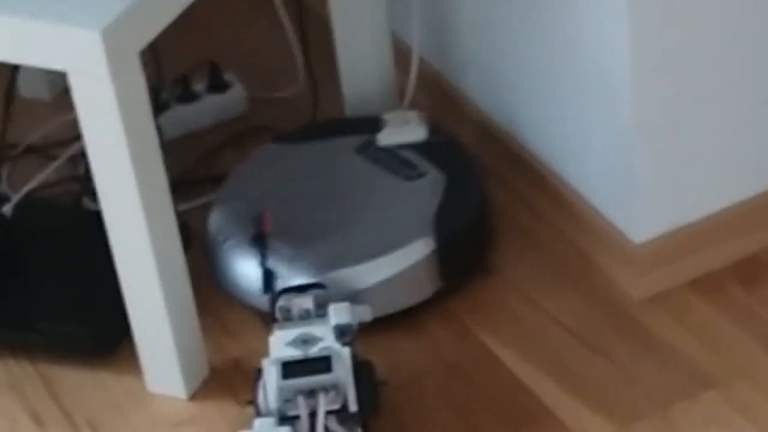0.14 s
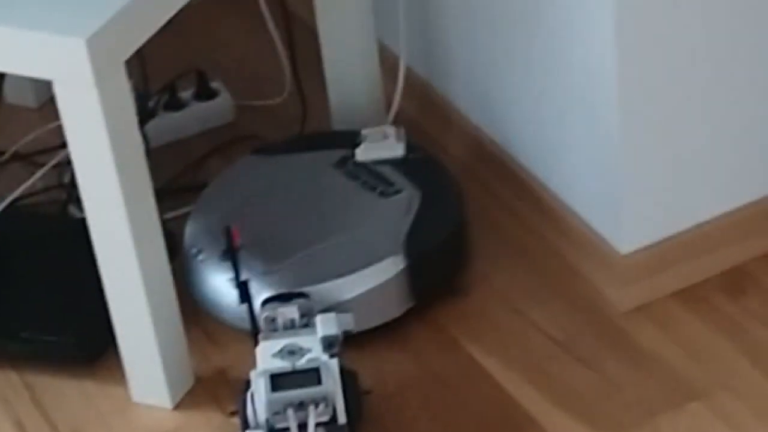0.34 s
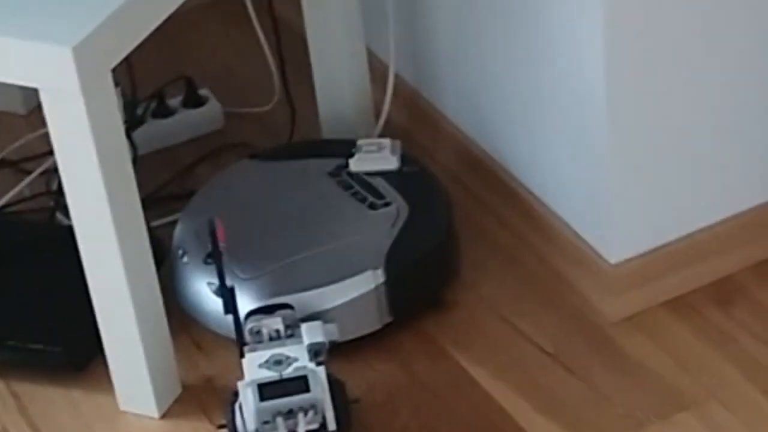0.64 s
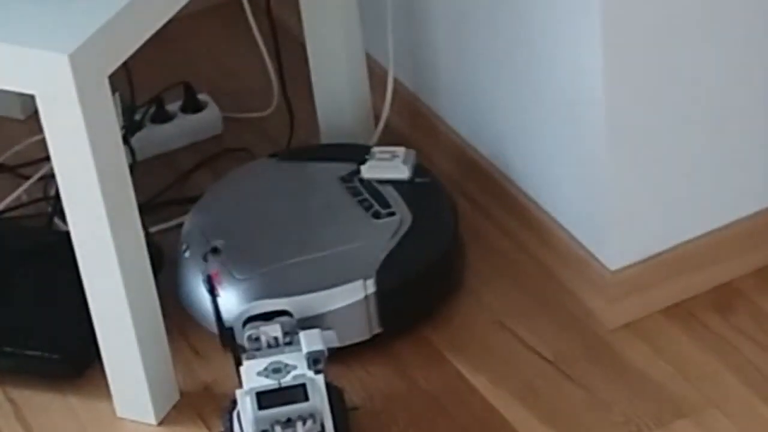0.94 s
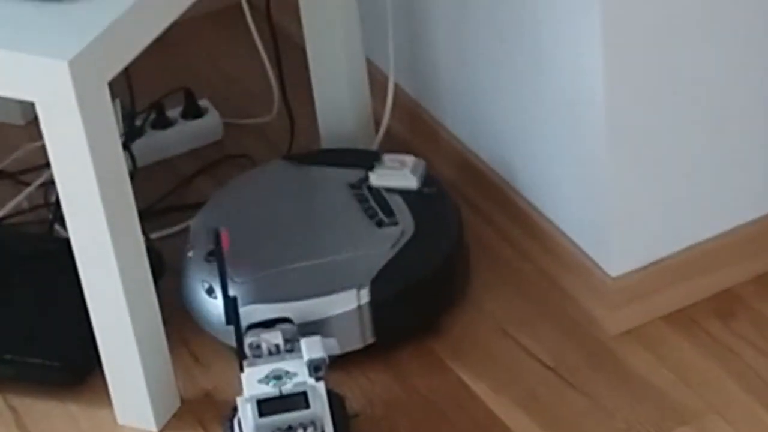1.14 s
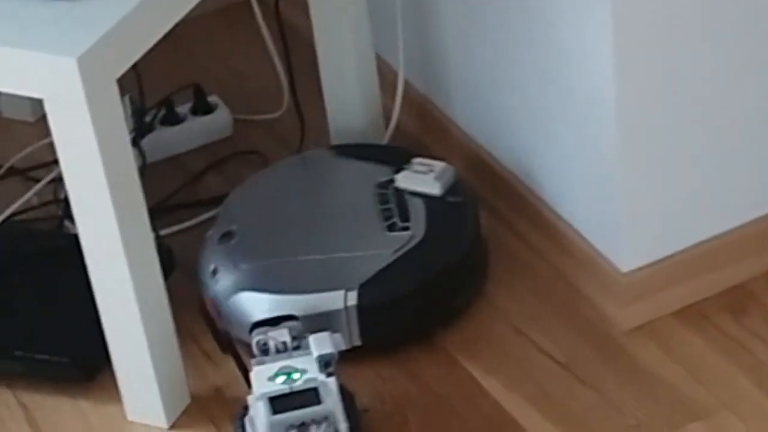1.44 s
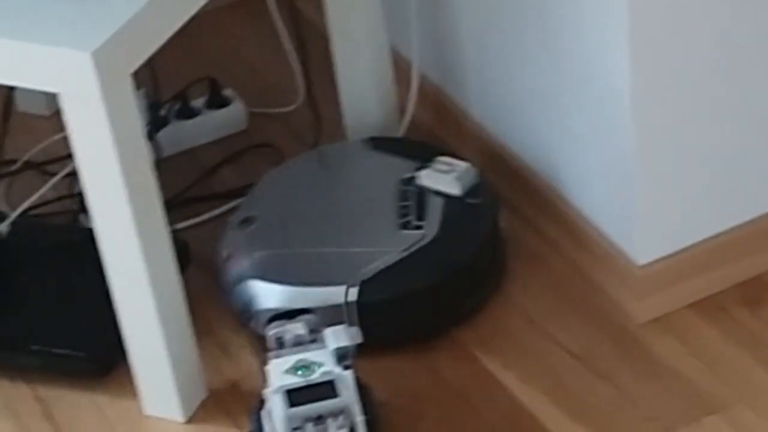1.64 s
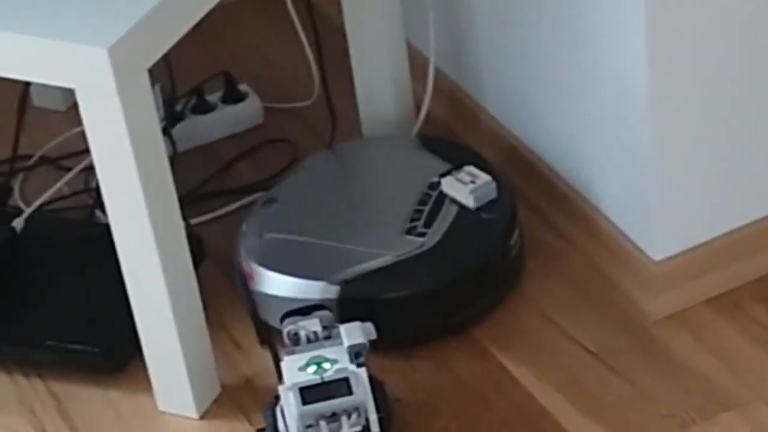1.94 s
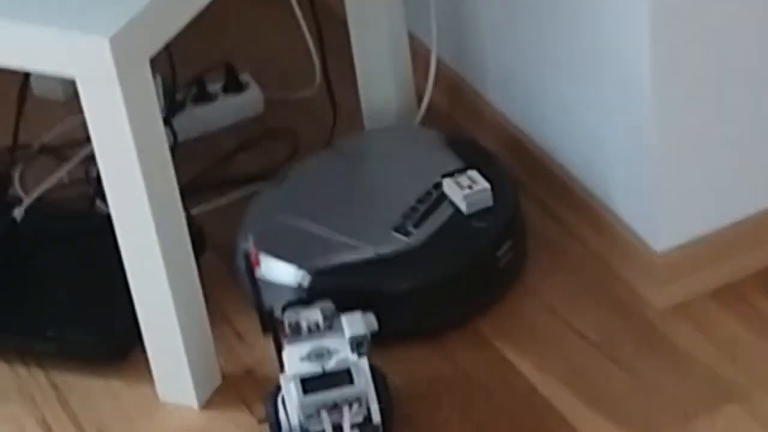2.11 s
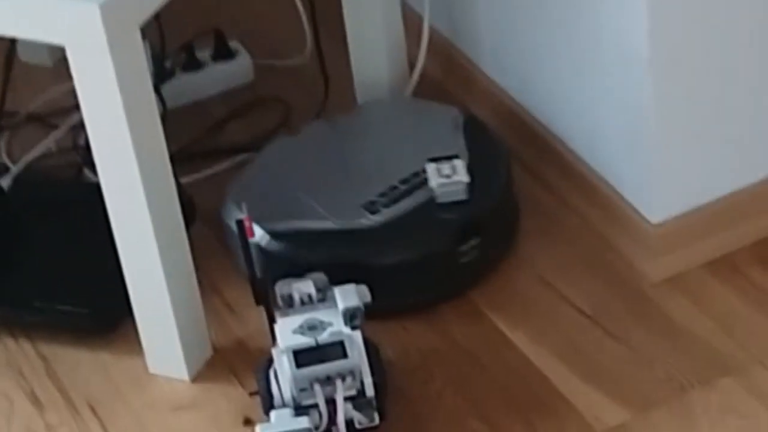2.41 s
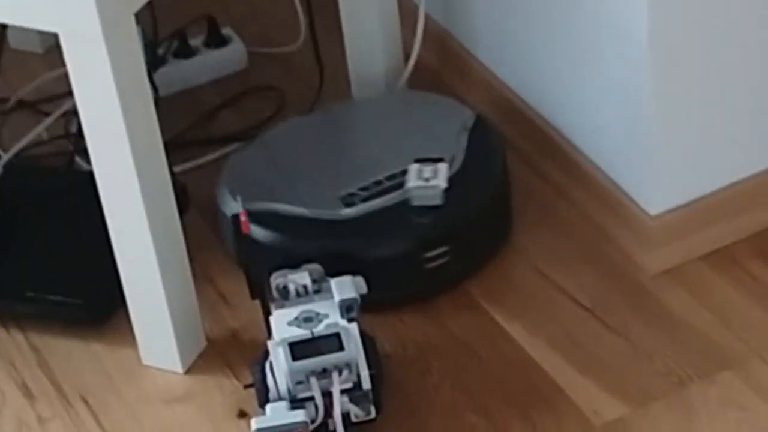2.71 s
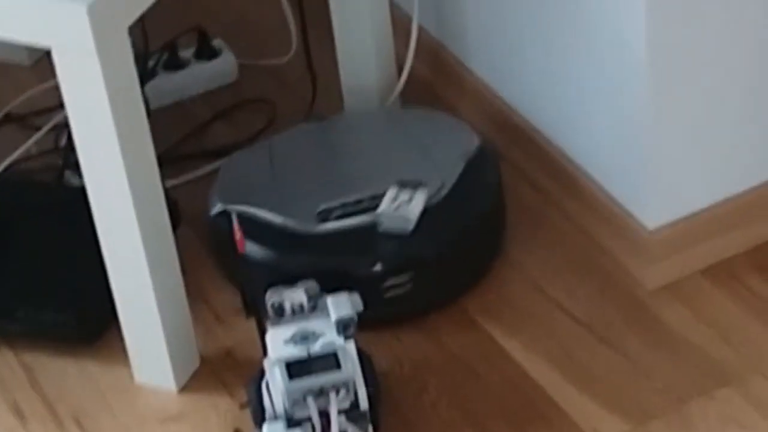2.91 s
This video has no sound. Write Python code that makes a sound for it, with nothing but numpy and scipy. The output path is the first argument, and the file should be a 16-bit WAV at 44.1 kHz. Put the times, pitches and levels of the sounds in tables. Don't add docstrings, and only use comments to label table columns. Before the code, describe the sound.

A robot vacuum whirs steadily on a wooden floor while a toy robot's servos grind and knock it.

```python
import sys
import numpy as np
from scipy import signal
from scipy.fft import rfft, irfft
from scipy.io import wavfile
from scipy.ndimage import uniform_filter1d

SR = 44100
rng = np.random.default_rng(int(sys.argv[2]) if len(sys.argv) > 2 else 0)


def wav_out(sig):
    wavfile.write(sys.argv[1], SR, np.round(np.clip(np.atleast_2d(sig).T, -1, 1) * 32767).astype(np.int16))


def makeup_ratio(level_db):
    decades = np.asarray(level_db, float) / 20
    return 10 ** decades


N = 134946
TURN_HZ = 48.15
FLUTTER_HZ, FLUTTER_TURN = 28.93, -.13


def shaft_hum():
    # (time [s], rotation [Hz], level [dB])
    shaft = [(0, 47.87, -47), (.7, 48, -41), (1.0, 48.2, -46.5), (1.2, 48.05, -41), (1.5, 48.27, -45),
             (1.7, 48.24, -40), (1.9, 48.12, -42), (2.0, 48, -40), (2.4, 48.12, -38), (2.7, 48.14, -38),
             (3.06, 48.24, -39)]
    # (shaft multiple [1], level [dB])
    gears = [(3, -21), (4, -19), (5, -15), (8, -4), (9, -13), (12, -9), (13, -12), (15, -13), (16, -9),
             (18, -13), (19, -12), (20, 1.5), (22, -8), (23, -9), (24, -8), (25, -11), (26, -10), (27, -11),
             (28, -7), (30, -14), (32, -14), (33, -6), (35, -11), (36, -9)]
    waver_db, wobble = 1.6, .001
    count = len(gears)
    drift = slow(.18, size=2 * count + 1)
    turns = np.cumsum(curve(shaft, column=1) * (1 + wobble * drift[-1])) / SR
    hum = 0
    for (order, db), waver, slip in zip(gears, drift[:count], drift[count:]):
        phase = 2 * np.pi * (order * turns + .15 * slip + rng.random())
        hum = hum + makeup_ratio(db + waver_db * waver) * np.sin(phase)
    return makeup_ratio(curve(shaft, column=2) + 1.5) * hum


def air_rush():
    # (frequency [Hz], spectral density [dB per Hz])
    air_spectrum = [(30, -51), (120, -51.5), (255, -11.5), (330, -1.5), (1000, 0), (1750, -1), (2100, -18),
                    (6000, -65.5)]
    # (frequency [Hz], spectral density [dB per Hz])
    jet_spectrum = [(1000, -34), (2200, -4.5), (3600, 1.5), (4600, -9.5), (8300, -17.5), (9200, -46),
                    (12000, -37), (15700, -48)]
    air = colour(geared(rng.standard_normal(N)), air_spectrum)
    jet = colour(geared(rng.standard_normal(N)), jet_spectrum)
    air = patchy(air, patchy_db=1.0, streak_db=2.0)
    jet = patchy(jet, patchy_db=0.9, streak_db=1.7) * ripple(hz=173.4, depth=0.11)
    return makeup_ratio(-35.5) * air + makeup_ratio(-38.5) * jet


def geared(x, repeat=.15):
    again = repeat * np.exp(-2j * np.pi * np.fft.rfftfreq(N, 1 / SR) / TURN_HZ)
    return irfft(rfft(x) * np.sqrt(1 - repeat ** 2) / (1 - again), N)


def ripple(hz, depth):
    speed = hz * (1 + 0.014 * slow(0.16, size=1)[0])
    return 1 + depth * np.cos(2 * np.pi * np.cumsum(speed) / SR)


def shell_modes():
    # (frequency [Hz], bandwidth [Hz], level [dB])
    modes = [(147.6, 11, -22), (205, 9, -6.5), (261.9, 10, 6.5), (382, 9, -15), (607, 82, -2.5),
             (990, 32, 1), (1560, 98, -5)]
    return makeup_ratio(-42.5) * evened(ring(rng.standard_normal(N), modes, widen=0.74))


def wheel_motor():
    # (time [s], frequency [Hz], level [dB])
    motor = [
        (2.15, 3430, -62),
        (2.3, 3400, -58),
        (2.5, 3436, -69),
        (2.75, 3483, -56),
        (2.9, 3530, -64),
        (3.06, 3555, -61),
    ]
    speed = curve(motor, column=1) + 15 * rng.standard_normal(N)
    db = curve([(1.9, 0, -88)] + motor, column=2)
    return makeup_ratio(db + 16.0 + 2.3 * slow(.18, size=1)[0]) * np.sin(2 * np.pi * np.cumsum(speed) / SR)


def servos():
    # (time [s], level [dB])
    effort = [(0, -37.5), (.1, -38), (.2, -37.5), (.5, -40), (.6, -37.5), (.7, -34.5), (.83, -37),
              (1.0, -39.5), (1.14, -40), (1.26, -39.5), (1.5, -36.5), (1.66, -40.5), (1.8, -36.5),
              (2.0, -40.5), (2.15, -46), (2.4, -48), (3.06, -48.5)]
    # (frequency [Hz], spectral density [dB per Hz])
    grind_spectrum = [(250, -38.5), (700, -2), (1400, 2.5), (3400, -0.5), (4800, -4), (8200, -7),
                      (10000, -17), (12500, -25.5), (15700, -36.5)]
    # (frequency [Hz], bandwidth [Hz], level [dB])
    poses = [
        [(2610, 47, 17), (3500, 210, -16), (3800, 30, 3), (8160, 32, 10)],
        [(4500, 49, -12), (6000, 150, -17), (7050, 34, 9), (7540, 32, 13.5), (8800, 15, -46), (9940, 47, 5)],
        [(5960, 46, 8), (6590, 67, 2.5), (6600, 33, -17), (8160, 25, -1), (9500, 50, 2)],
    ]
    pose_times = [.1, .55, 1.2, 1.5]
    pose_levels = [-9, -8.5, -6]
    grit_share = 0.37
    drive = grit_share * evened(grit(per_s=2500, spread_db=2.5, size=N))
    drive = drive + (1 - grit_share) * rng.standard_normal(N)
    drive = drive * ripple(hz=248, depth=0.15)
    pose = np.interp(np.arange(N) / SR, pose_times, [0.64, 0.65, 1.2, 1.47])
    housing = 0
    for k, (modes, db) in enumerate(zip(poses, pose_levels)):
        nearness = np.sqrt(np.clip(1 - abs(pose - k), 0, 1))
        housing = housing + nearness * makeup_ratio(db) * evened(ring(drive, modes, widen=1.6))
    grind = patchy(colour(drive, grind_spectrum), patchy_db=2.0, streak_db=2.2)
    return makeup_ratio(curve(effort, column=1)) * (makeup_ratio(4.5) * grind + housing)


def songs():
    # (start [s], length [s], frequency [Hz], level [dB])
    tones = [(0.025, 0.15, 1260, -40.5), (0.31, 0.2, 1281, -40), (0.26, 0.38, 2100, -43.5),
             (0.63, 0.11, 3160, -43), (0.6, 0.35, 2520, -45), (0.554, 0.13, 1300, -42.5),
             (0.652, 0.24, 6100, -50.5), (.88, 0.46, 11000, -73), (1.5, 0.45, 2800, -50),
             (1.82, 0.27, 2500, -46), (1.9, 0.18, 2700, -41), (1.255, .2, 1810, -46),
             (2.716, .34, 1300, -45), (2.85, .2, 1400, -47.5), (2.1, 0.24, 7000, -58),
             (2.408, 0.31, 1740, -47)]
    rough_hz = 11.9
    t, out = np.arange(N) / SR, 0
    for (start, length, hz, db), drift in zip(tones, slow(.03, size=len(tones))):
        swell = np.sqrt(np.sin(np.pi * np.clip((t - start) / length, 0, 1)) + 1e-9)
        phase = 2 * np.pi * np.cumsum(hz + rough_hz * drift[::-1]) / SR
        out = out + makeup_ratio(db + 7.5 + 0.91 * drift) * swell * np.sin(phase)
    return out


def knocks():
    # (time [s], peak level [dB], rattle length [s], part struck [index])
    impacts = [(0.198, -20, 0.0051, 0), (0.2059, -19.5, 0.011, 0), (0.222, -8, 0.0024, 0),
               (0.229, -16.5, 0.018, 0), (0.238, -23.5, 0.0055, 0), (0.339, -26, 0.008, 0),
               (.82, -27.5, 0.0064, 1), (1.3034, -19, 0.023, 1), (1.309, -18.5, 0.0058, 1),
               (1.36, -29, 0.0083, 1), (1.545, -22, 0.011, 2), (1.559, -21, 0.0073, 2),
               (1.578, -16, 0.0097, 2), (1.586, -18, .004, 2), (1.7045, -26, 0.0026, 2)]
    # (frequency [Hz], bandwidth [Hz], level [dB])
    part_modes = [
        [(614, 83, 0.5), (1280, 220, -0.5), (1825, 170, 0), (1935, 130, 0.5), (2680, 130, -0.5),
         (3220, 210, -15), (4800, 92, -26), (6200, 37, -16), (7670, 1500, -13)],
        [(614, 84, -5), (1610, 85, 3), (1832, 91, 0.5), (2810, 60, -3), (2982, 38, 0.5), (3220, 35, -0.5),
         (3676, 130, -1), (7500, 500, -10)],
        [(640, 59, -8), (1340, 150, -16), (2330, 54, -6), (2627, 110, 0), (3006, 100, 3), (3376, 80, -14)],
    ]
    # (frequency [Hz], spectral density [dB per Hz])
    crack_spectra = [
        [(400, -27.5), (600, -0.5), (1300, -2), (3200, 1.5), (5200, -13), (8000, -4), (9500, -24.5),
         (15700, -34)],
        [(200, -42), (620, -1.5), (1100, -22.5), (1700, -8.5), (3400, -0.5), (4500, -14.5), (7800, -8.5),
         (15700, -50)],
        [(200, -36), (700, -13), (2000, -6.5), (2700, -1), (3700, -12), (4600, -18.5), (9000, -27),
         (15700, -51)],
    ]
    ring_levels = [-2.5, -5, -4.5]
    wet_levels = [2.5, 4.5, 1.3]
    rise_s = .004
    t, out = np.arange(N) / SR, np.zeros(N)
    ticks = evened(grit(per_s=5000, spread_db=1.0, size=N)) + 0.68 * rng.standard_normal(N)
    for part in range(len(part_modes)):
        envelope = np.zeros(N)
        for start, db, length, struck in impacts:
            if round(struck) == part:
                rise = np.clip((t - start) / rise_s, 0, 1)
                envelope += makeup_ratio(db) * rise * np.exp(-(np.maximum(t - start, 0) / length) ** 4)
        force = envelope * ticks
        crack = colour(force, crack_spectra[part])
        rung = ring(force, part_modes[part], widen=0.31)
        crack = crack / np.linalg.norm(crack)
        rung = makeup_ratio(ring_levels[part]) * rung / np.linalg.norm(rung)
        direct = 0.5 * np.linalg.norm(force) * (crack + rung)
        out += direct + makeup_ratio(wet_levels[part]) * signal.fftconvolve(direct, room())[:N]
    return out


def clicks():
    # (time [s], peak level [dB], frequency [Hz])
    snaps = [
        (0.21, -31, 10700),
        (0.2329, -28, 10800),
        (0.2464, -32, 11400),
        (0.3424, -31, 12200),
        (0.611, -40, 12500),
        (0.81, -36, 11900),
        (1.3054, -29, 10900),
    ]
    decay_s, width_hz = .002, 2400
    t, noise = np.arange(N) / SR, rng.standard_normal(N)
    direct = 0
    for start, db, hz in snaps:
        burst = noise * (t > start) * np.exp(-np.maximum(t - start, 0) / decay_s)
        direct = direct + ring(burst, [(hz, width_hz, db + 5.5)])
    return direct + makeup_ratio(3.5) * signal.fftconvolve(direct, room())[:N]


def room():
    # (frequency [Hz], time to fall 60 dB [s])
    decay = [(400, 1.5), (1500, 1.55), (3500, 1.9), (8000, 1.6), (14000, 0.66)]
    hz, t, z = signal.stft(rng.standard_normal(2 * SR), SR, nperseg=256)
    tail = signal.istft(z * makeup_ratio(-60 * t / read(decay, hz)[:, None]), SR, nperseg=256)[1]
    onset = np.minimum(np.arange(len(tail)) / SR / 0.0061, 1)
    return tail * onset / np.linalg.norm(tail)


def microphone_hiss():
    # (frequency [Hz], spectral density [dB per Hz])
    hiss_spectrum = [(5000, -16), (9000, -5), (12300, 0), (15700, -3)]
    return makeup_ratio(-65) * evened(colour(rng.standard_normal(N), hiss_spectrum))


def slowed(x):
    # (time [s], jump back [s])
    known_jumps = [
        (.246, .018),
        (.35, .0185),
        (1.318, .0164),
        (1.595, .0215),
    ]
    shortest_s, longest_s, on_turn_share = .0155, .027, .3
    fade_in, hold_to, fade_out = .36, .5, .12
    out, step = x.copy(), SR / FLUTTER_HZ
    turn = np.arange(round((fade_in / 2 + hold_to + fade_out) * step)) / step
    fade = np.minimum(turn / fade_in, (turn[-1] - turn) / fade_out)
    again = np.clip(fade, 0, 1) * np.pi / 2
    count = int(N / step)
    luck = rng.random((count + 1, 2))
    free_jump = shortest_s + (longest_s - shortest_s) * luck[:, 1]
    jump = np.where(luck[:, 0] < on_turn_share, 1 / TURN_HZ, free_jump)
    for s, back in known_jumps:
        jump[round(s * FLUTTER_HZ + FLUTTER_TURN)] = back
    for k in range(1, count + 1):
        at = round((k - FLUTTER_TURN - fade_in / 2) * step) + np.arange(len(turn))
        inside = at < N
        earlier = out[(at - round(jump[k] * SR)) % N]
        blend = np.cos(again) * out[at % N] + np.sin(again) * earlier
        out[at[inside]] = blend[inside]
    return out


def evened(x):
    return x / np.sqrt(np.mean(x ** 2) + 1e-20)


def read(points, hz):
    f, value = np.transpose(points)
    return np.interp(np.log(hz + 1), np.log(f + 1), value)


def curve(rows, column):
    rows = np.array(rows)
    return np.interp(np.arange(N) / SR, rows[:, 0], rows[:, column])


def colour(x, points):
    gain = np.log(makeup_ratio(read(points, abs(np.fft.fftfreq(4096, 1 / SR)))))
    taps = np.fft.ifft(np.exp(gain - 1j * signal.hilbert(gain).imag)).real[:2048]
    return signal.oaconvolve(x, taps)[:len(x)]


def ring(x, peaks, widen=1.):
    out = 0
    for hz, width, db in peaks:
        b, a = signal.iirpeak(hz, hz / max(widen * width, 5), SR)
        out = out + makeup_ratio(db) * signal.lfilter(b, a, x)
    return out


def slow(seconds, size):
    step = rng.standard_normal((size, N // 256 + 2))
    step = uniform_filter1d(step, max(int(seconds * SR / 256), 1))
    step = uniform_filter1d(step, 3)
    return np.array([np.interp(np.arange(N) / 256, np.arange(len(s)), evened(s)) for s in step])


def patchy(x, patchy_db, streak_db):
    z = signal.stft(x, nperseg=2048, noverlap=1536)[2]
    a, b = rng.standard_normal((2, *z.shape))
    patch = uniform_filter1d(uniform_filter1d(a, size=14, axis=1), size=16, axis=0)
    streak = uniform_filter1d(uniform_filter1d(b, size=20, axis=1), size=14, axis=1)
    gain = makeup_ratio(patchy_db * evened(patch) + streak_db * evened(streak))
    return evened(signal.istft(z * gain, nperseg=2048, noverlap=1536)[1][:N])


def grit(per_s, spread_db, size):
    u = rng.random((size, 3))
    height = makeup_ratio(spread_db * np.minimum(-np.log(u[:, 2] + 1e-9), 5))
    return (u[:, 0] < per_s / SR) * np.sign(u[:, 1] - .5) * height


def scene():
    tones = shaft_hum() + wheel_motor() + shell_modes() + songs()
    noises = air_rush() + servos() + knocks() + clicks() + microphone_hiss()
    mix = tones + slowed(noises)
    return np.array([mix, mix])


def band_limit(x):
    return signal.sosfilt(signal.butter(12, 15760, fs=SR, output="sos"), x)


def record(dry):
    low_hz, edge_hz, dip_db, sharpness = 45, 15650, -2.9, 1.8
    band = signal.sosfilt(signal.butter(2, low_hz, "high", fs=SR, output="sos"), dry)
    lowpass = signal.firwin(511, edge_hz, window=("kaiser", 9), fs=SR)
    band = signal.oaconvolve(band, lowpass[None], "same")
    turn = 2 * np.pi * (FLUTTER_HZ * np.arange(N) / SR + FLUTTER_TURN)
    dip = ((1 + np.cos(turn)) / 2) ** sharpness
    return band_limit(band * makeup_ratio(dip_db * dip))


dry = scene()
out = record(dry)
wav_out(out)
```